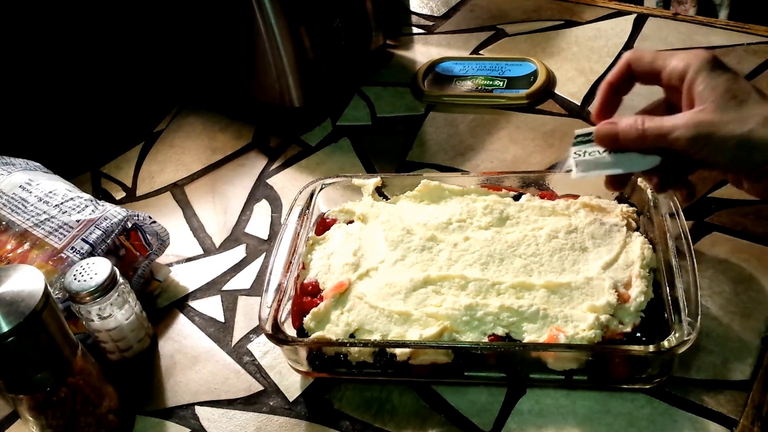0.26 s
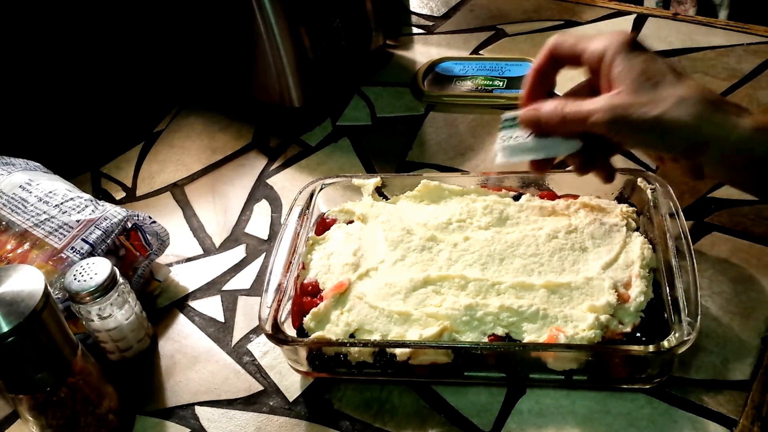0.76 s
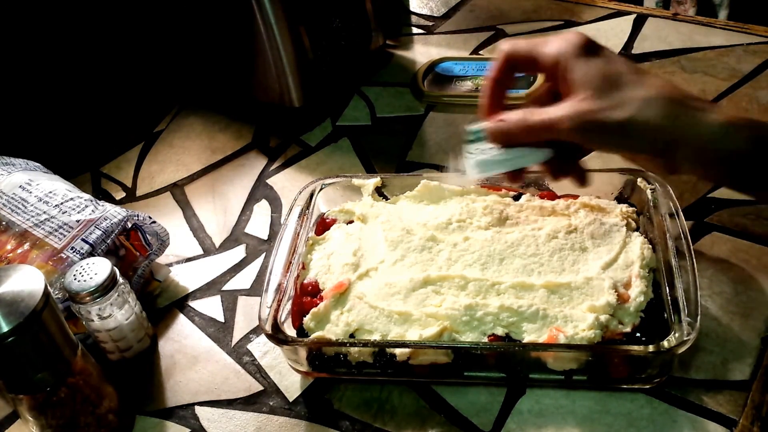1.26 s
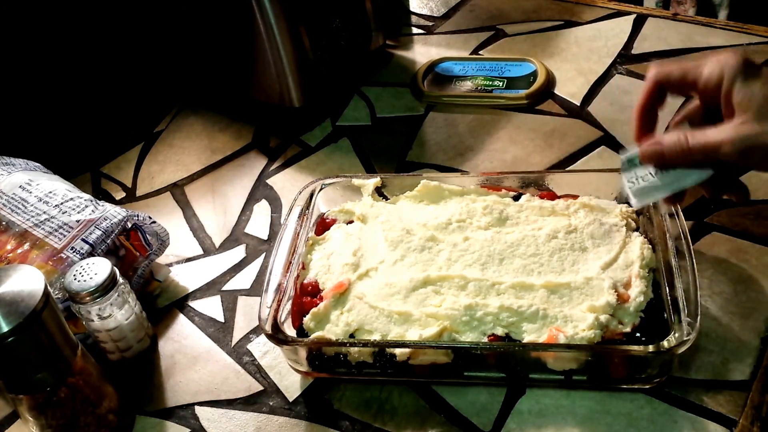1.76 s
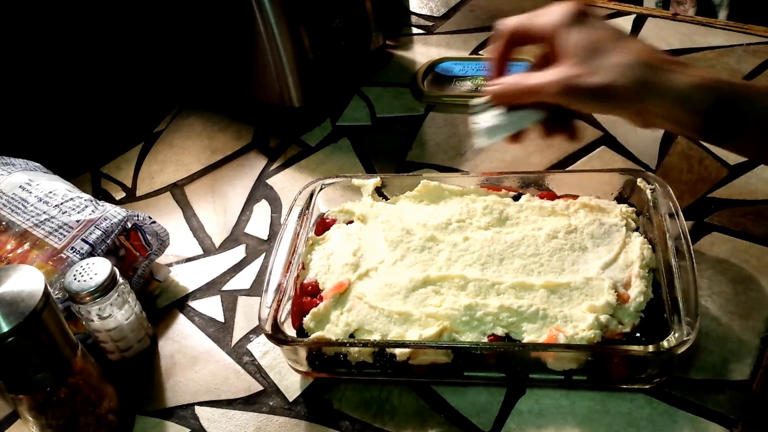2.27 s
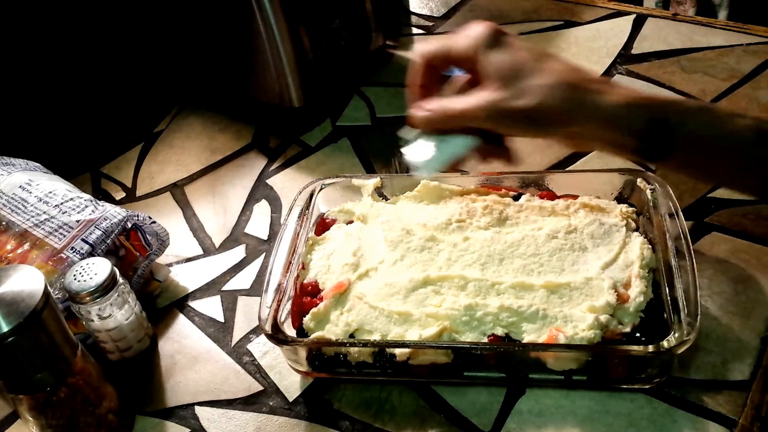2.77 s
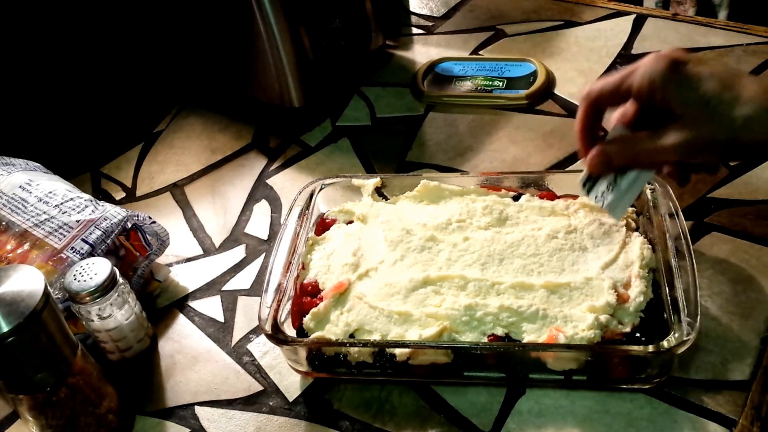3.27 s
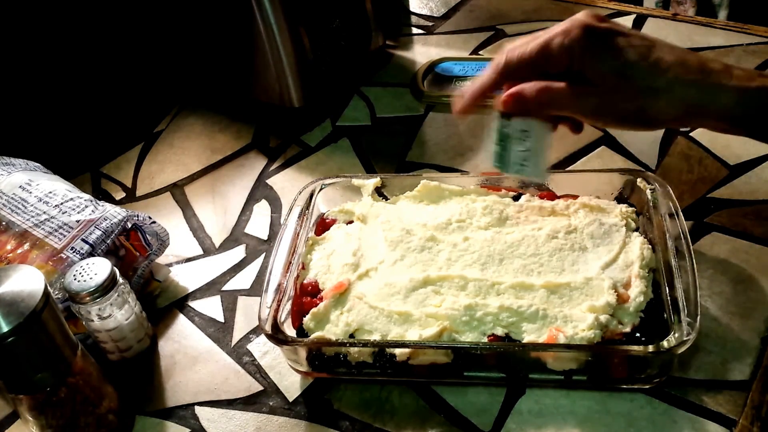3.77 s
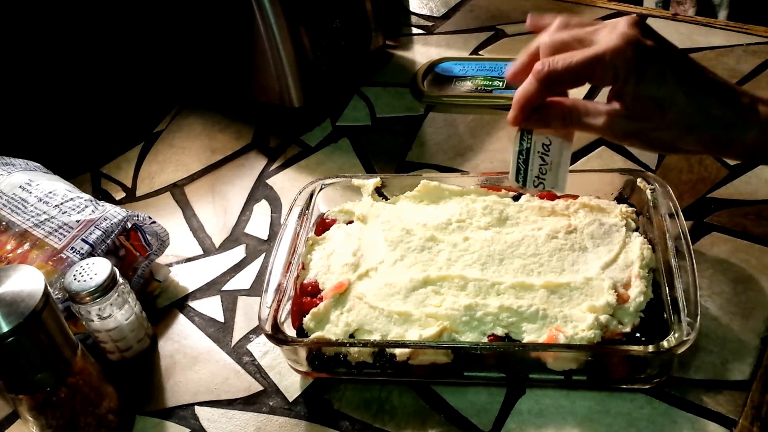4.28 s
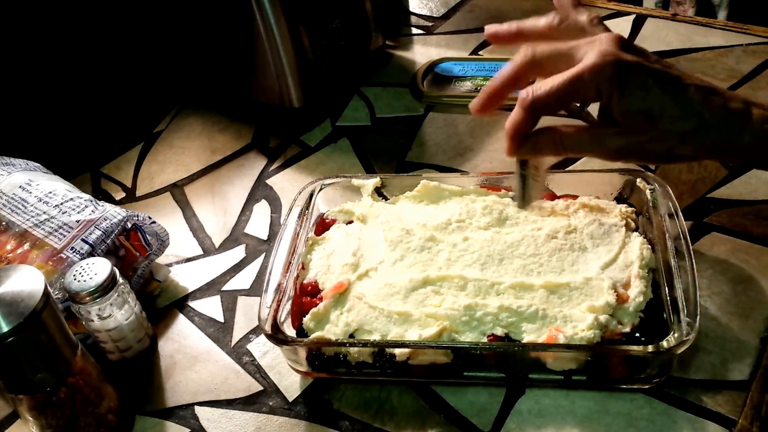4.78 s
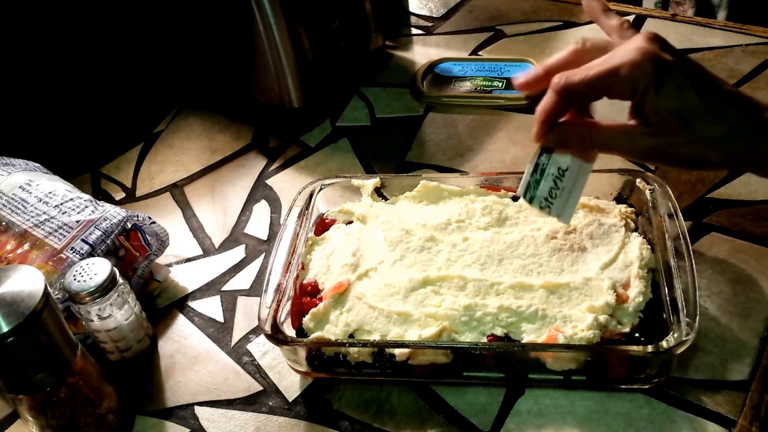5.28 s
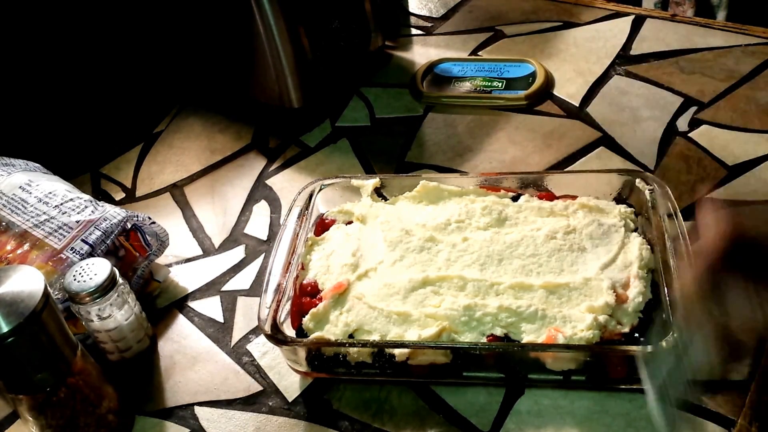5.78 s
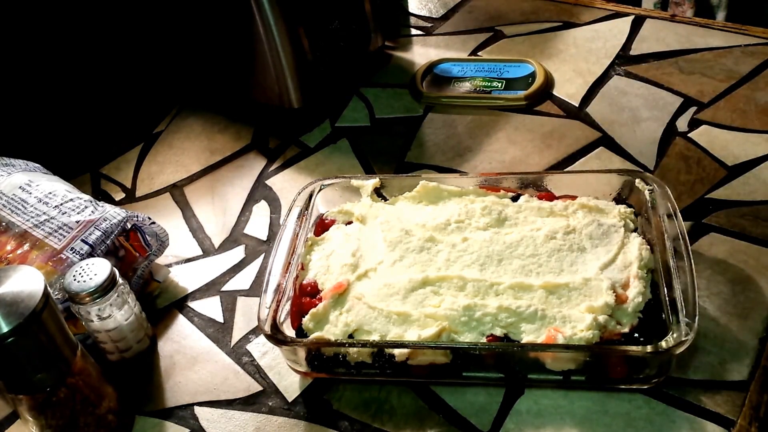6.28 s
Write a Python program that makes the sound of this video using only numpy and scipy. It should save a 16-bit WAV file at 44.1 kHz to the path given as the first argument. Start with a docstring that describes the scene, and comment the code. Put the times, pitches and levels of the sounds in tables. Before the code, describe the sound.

Close stereo pickup in a small quiet kitchen. A paper packet of granules is shaken about eleven times a second, each stroke a soft, bright, grainy hiss. The shaking slows and fades, then fingers pinch and flick the packet: clumped crackle and loud crisp snaps, ending in sparse small ticks. Low rumble, hum and thin hiss stay far underneath.

```python
"""A small paper packet of granules is shaken to and fro over a dish: each stroke is a swell of dense impacts.
It is then pinched and flicked empty: fingers rustle as clumped crackle, creases snap as noise bursts that
set panels ringing, and the sheet's body grows. A kitchen of rumble, hum and hiss runs below throughout,
with three far knocks and two low washes. Two microphone ports each ring at their own treble pitch."""
import sys
import numpy as np
from scipy import signal
from scipy.io import wavfile
from scipy.ndimage import uniform_filter1d

SR = 44100
rng = np.random.default_rng(int(sys.argv[2]) if len(sys.argv) > 2 else 0)


def inscribe(sig):
    """Save sig as 16-bit PCM at rate SR to the path in sys.argv[1].

    A 1-D sig is mono; a 2-D sig holds one channel per row.
    Samples are clipped to [-1, 1] before scaling.
    """
    pcm = np.round(np.clip(np.atleast_2d(sig).T, -1, 1) * 32767)
    wavfile.write(sys.argv[1], SR, pcm.astype(np.int16))


N = 287644
TIME = np.arange(N) / SR

# creases snapping: start_s, level_db (bright part's peak), panel_ring_hz,
# low_db (850-2600 Hz part re bright part), crackle_db (crackle after, re level_db)
CREASE_SNAPS = [(0.232, -38, 2850, -11, -19), (1.267, -23.5, 4400, -29, -35),
                (1.9727, -43, 2780, -2.5, -28), (2.811, -36, 3600, -13, -35), (2.9262, -27, 4460, -25, -29),
                (3.46, -34.5, 4390, -29, -28.5), (3.5016, -22.5, 3170, -18.5, -28),
                (3.584, -25, 4870, -12, -31), (3.674, -32, 4550, -33, -27), (3.6926, -34.5, 4500, -31, -12),
                (3.717, -15, 4730, -40, -21.5), (3.7819, -16, 4400, -17, -16),
                (3.8078, -24, 4500, -12.5, -12), (3.8215, -13, 2670, -29, -28),
                (3.841, -18.5, 4360, -17, -26), (3.856, -24, 4180, -34, -27),
                (3.908, -23, 4800, -16.5, -18), (3.939, -39, 4500, -28, -28), (3.956, -34, 4410, -35, -23),
                (3.9719, -29, 4470, -37, -14), (4.1128, -21, 2500, -16.5, -24),
                (4.1977, -44.5, 4450, -30, -18), (4.2198, -51.5, 2590, -37, -29),
                (4.277, -40, 4600, -28, -5), (4.2873, -13, 4840, -29.5, -15.5),
                (4.342, -12, 2730, -30, -24.5), (4.411, -24.5, 4700, -36, -22),
                (4.4215, -35, 2370, -18, -31), (4.4975, -40, 3000, -30, -13),
                (4.5657, -24.5, 4900, -16, -21), (4.66, -32, 2600, -17, -20), (4.7832, -31, 4450, -30, -5),
                (4.7902, -9, 3650, -24.5, -17.5), (4.8073, -12, 3380, -39, -15),
                (4.8109, -11.5, 2570, -15, -13.5), (4.879, -29, 2600, -22, -10),
                (4.9277, -27.5, 4490, -26, -4.5), (4.9372, -9, 3380, -34, -24),
                (4.9509, -17.5, 2720, -26, -15.5), (5.024, -22.5, 2830, -15, -17),
                (5.1598, -12, 3170, -31, -13), (5.2095, -23, 3050, -13.5, -20),
                (5.269, -40, 2620, -29, -27), (5.3162, -15.5, 3130, -34, -19),
                (5.3777, -15.5, 2740, -17.5, -27.5), (5.395, -26, 3800, -11, -31),
                (5.458, -25, 4540, -20, -30), (5.4649, -23, 2660, -26, -36), (5.628, -44.5, 3970, -20, -11),
                (5.682, -50, 2580, -30, -19), (5.753, -45.5, 3450, -10, -1.5),
                (5.9286, -43, 3690, -20, -21), (5.9385, -44, 3490, -23, -24),
                (6.091, -52.5, 4580, -16, -25), (6.2195, -42, 2090, -15, -23), (6.2368, -41, 2550, -5, -34),
                (6.2637, -31.5, 2730, -15.5, -24), (6.2696, -18, 4260, -29, -30),
                (6.3529, -35.5, 3450, -23, -16), (6.421, -47, 2090, -10, -21), (6.4942, -56, 3150, -7, -30)]
# where the packet is: time_s, left_re_right_db
HAND_PATH = [(0.0, 2.5), (1.05, 0), (1.89, 0.0), (2.54, 0), (3.47, 2), (4.99, 1.0), (6.3, 3), (6.52, 3)]


def amp(db):
    """Convert dB to amplitude gain."""
    return 10 ** (np.asarray(db) / 20)


def rms_one(x):
    """Scale to rms 1."""
    return x / np.sqrt(np.mean(x ** 2) + 1e-20)


def in_time(rows):
    """Interpolate a (time, value) curve at every sample."""
    time_s, value = np.transpose(rows)
    return np.interp(TIME, time_s, value)


def at_hz(points, hz):
    """Read a (frequency, value) curve on a log frequency axis."""
    point_hz, value = np.transpose(points)
    return np.interp(np.log(hz), np.log(point_hz), value)


def pan(db):
    """Left and right gains for a left-re-right difference."""
    return amp(np.array([db / 2, -db / 2]))


def drift(points_per_s):
    """Slow random curve: straight lines between normal draws of spread 1."""
    count = N * 2 // 100
    return np.interp(TIME * points_per_s, np.arange(count), rng.standard_normal(count))


def band(x, low_hz, high_hz):
    """Butterworth band-pass."""
    return signal.sosfilt(signal.butter(2, [low_hz, high_hz], "band", fs=SR, output="sos"), x)


def resonate(x, hz, width_hz):
    """Two-pole resonance with gain near 1 at its peak."""
    r = np.exp(-np.pi * width_hz / SR)
    zeros = np.array([1, 0, -1]) * (1 - r * r) / 2
    poles = [1, -2 * r * np.cos(2 * np.pi * hz / SR), r * r]
    return signal.lfilter(zeros, poles, x)


def granules():
    """Granules thrown against the paper: each stroke swells and fades as a bell of dense impacts."""
    # one row a wrist stroke: peak_s, level_db, length_ms (between points 6.5 dB down)
    strokes = [(0.0, -46.5, 37), (0.094, -49.5, 45), (0.165, -45.5, 45), (0.259, -47.5, 70),
               (0.343, -44.5, 53), (0.438, -44.5, 33), (0.501, -39, 44), (0.603, -47.5, 47),
               (0.692, -48, 44), (0.774, -56, 110), (0.854, -46, 39), (0.949, -51, 39), (1.022, -47, 52),
               (1.11, -51, 41), (1.196, -43.5, 52), (1.275, -41.5, 45), (1.37, -42, 48), (1.462, -52, 45),
               (1.546, -49, 54), (1.64, -57, 77), (1.714, -47, 46), (1.825, -55.5, 73), (1.885, -47.5, 39),
               (1.98, -53.5, 62), (2.043, -48.5, 46), (2.15, -58.5, 59), (2.206, -51.5, 57),
               (2.375, -55, 116), (2.543, -51.5, 79), (2.657, -50, 46), (2.72, -42, 49), (2.84, -52.5, 117),
               (3.056, -51, 76), (3.15, -60.5, 84), (3.235, -58, 51)]
    thrum_db = -0.5  # re sheet body
    hits = grains(8000, spread_db=3.5, alike=0.21)
    hiss = coloured(hits, low_hz=4300, width=0.47, shift_db=2.5, tilt_db=-2)
    thrum = amp(thrum_db + sheet_body_db()) * rms_one(resonate(hits, 3180, 470))
    envelope = np.sqrt(swells(strokes, rise_share=0.52)) * amp(1.07 * drift(150))
    return envelope * pan(in_time(HAND_PATH)) * (hiss + thrum)


def paper():
    """Clumped paper crackle: under the sliding fingers and dying away after each snap."""
    # fingers sliding: peak_s, level_db, length_ms (between points 6.5 dB down)
    rubs = [(3.39, -64.5, 88), (3.53, -48.5, 100), (3.62, -48, 55), (3.667, -49.5, 53), (3.747, -46, 70),
            (3.844, -30.5, 46), (3.95, -45.5, 61), (4.08, -55, 68), (4.387, -48.5, 47), (4.508, -49, 41),
            (4.618, -44.5, 55), (4.668, -36, 10.5), (4.76, -41, 9), (4.865, -41.5, 66), (4.983, -42, 50),
            (5.029, -37.5, 27), (5.203, -33.5, 33), (5.29, -49.5, 81), (5.425, -44.5, 55), (5.585, -65, 38),
            (5.785, -51.5, 44), (5.835, -58.5, 42), (5.95, -60, 53.5), (6.24, -49, 18), (6.295, -52.5, 32),
            (6.35, -50.5, 65)]
    crackle_t60_s = 0.1
    power = swells(rubs, rise_share=0.49)
    for start_s, level_db, _, _, crackle_db in CREASE_SNAPS:
        after = slice(round(start_s * SR), round((start_s + crackle_t60_s) * SR))
        decay_db = -60 * (TIME[after] - start_s) / crackle_t60_s
        power[after] += amp(2 * (level_db + crackle_db + decay_db))
    clumping = amp(2.2 * drift(250) + 1.26 * drift(60))
    hits = grains(10000, spread_db=3.0, alike=0.24) * clumping
    hits = hits + amp(-3) * grains(350, spread_db=3.5, alike=0.8)  # single fibres let go in tiny snaps
    body = rms_one(sheet(hits)) * amp(sheet_body_db() + 1.53 * drift(40))
    rustle = coloured(crease(hits), low_hz=3800, width=0.22, shift_db=3.5, tilt_db=-2.3)
    return np.sqrt(power) * pan(in_time(HAND_PATH)) * (rustle + body)


def snaps():
    """A crease gives way in a burst of a millisecond or two and sets a panel of the sheet ringing."""
    size = 600  # samples
    scatter_db = 1  # left-right spread of creases about the hand
    panel_ring_db, ring_per_low_db = -9.5, 0.35  # the panel rings more after a weightier snap
    out = np.zeros((2, N + size))
    t = np.arange(size) / SR
    hand_db = in_time(HAND_PATH)
    shape = (1 - np.exp(-t / 0.0003)) * (np.exp(-t / 0.0006) + 0.1 * np.exp(-t / 0.003))
    noises = rng.standard_normal((len(CREASE_SNAPS), 3, size + 1))
    for (start_s, level_db, ring_hz, low_db, _), noise in zip(CREASE_SNAPS, noises):
        first = round(start_s * SR)
        burst = (noise[0, 1:] + 0.7 * noise[1:, 1:]) * shape  # shared plus own noise per side
        bright = ports(crease(band(burst, 3550, 15000)))
        ring = resonate(resonate(burst, ring_hz, 800), ring_hz, 800)
        low = band(burst, 850, 2600)
        ring_db = panel_ring_db + ring_per_low_db * low_db
        parts = [(bright, 0), (ring, ring_db), (low, low_db)]
        sound = sum(amp(db) * p / np.abs(p).max(axis=1, keepdims=True) for p, db in parts)
        side = pan(hand_db[first] + scatter_db * noise[0, 0])[:, None]
        out[:, first:first + size] += amp(level_db) * side * sound
    return out[:, :N]


def grains(per_s, spread_db, alike):
    """Random tiny impacts of uneven size and either sign, partly shared by both sides; rms 1."""
    shape = (3, N)
    hits = (rng.random(shape) < per_s / SR) * amp(spread_db * np.minimum(rng.exponential(1, shape), 5))
    hits = hits * rng.choice([-1, 1], shape)
    return rms_one(np.sqrt(alike) * hits[0] + np.sqrt(1 - alike) * hits[1:])


def swells(rows, rise_share):
    """Summed power of bells; rise_share is the part of each length spent rising."""
    power = np.zeros(N)
    for peak_s, level_db, length_ms in rows:
        near = slice(max(round((peak_s - 0.25) * SR), 0), round((peak_s + 0.25) * SR))
        late_ms = (TIME[near] - peak_s) * 1000
        half_ms = length_ms * np.where(late_ms < 0, rise_share, 1 - rise_share)
        power[near] += amp(2 * (level_db - 6.5 * np.abs(late_ms / half_ms) ** 1.284))
    return power


def coloured(hits, low_hz, width, shift_db, tilt_db):
    """Deal impacts to patches of paper, each with its own broad pitch; through the ports, rms 1."""
    pitches_hz, out = np.geomspace(low_hz, 14500, num=7), 0
    dealt = rng.integers(0, len(pitches_hz), N)
    for k, hz in enumerate(pitches_hz):
        share = amp(tilt_db * np.log2(hz / 7200) + shift_db * drift(13))  # tilt per octave; patches take turns
        patch = hits * (dealt == k) + 1e-18
        out = out + share * resonate(patch, hz, width * hz)
    return rms_one(ports(out))


def crease(x):
    """Stiff creased paper: a duller top plus one broad treble resonance."""
    # ring_hz, width_hz, level_db
    ring_hz, width_hz, level_db = (5570, 990, 7.9)
    dull = signal.sosfilt(signal.butter(2, 10000, fs=SR, output="sos"), x)
    return dull + amp(level_db) * resonate(dull, ring_hz, width_hz)


def sheet(x):
    """Broad sheet resonances of alternating sign, each waxing and waning as the sheet bends."""
    # paper body: pitch_hz, width_hz, level_db
    modes = [(3044, 360, 17.5), (1310, 1300, 10.5), (506, 340, 10), (4470, 1430, 13)]
    out = 0
    for k, (hz, width_hz, level_db) in enumerate(modes):
        out = out + (-1) ** k * amp(level_db + 4.7 * drift(25)) * resonate(x, hz, width_hz)
    return out


def sheet_body_db():
    """Body level re the rustle or granule hiss, rising as the packet empties."""
    full_db, empty_db, emptying_s = -35, -8, (0.38, 5.64)
    return np.interp(TIME, emptying_s, [full_db, empty_db])


def ports(x):
    """Each microphone port rings at its own pitch over a weak flat path; the right is a little later."""
    # left, right: ring_hz, width_hz, flat_re_ring_db
    port_rings = [(6755, 840, -19.5), (7910, 1010, -17)]
    out = np.array([resonate(side, hz, width_hz) + amp(flat_db) * side
                    for side, (hz, width_hz, flat_db) in zip(x, port_rings)])
    out[1] = np.roll(out[1], 1)  # samples
    return out


def counter_and_walls(x):
    """Tiles, dish and walls as a short decaying noise tail, stronger early, separate in each side."""
    room_t60_s, room_db = 0.13, -11
    t = np.arange(int(0.2 * SR)) / SR
    tail = rng.standard_normal((2, len(t))) * amp(-60 * t / room_t60_s) * (t > 0.0012)
    tail[:, :int(0.006 * SR)] *= 1.8
    tail /= np.sqrt((tail ** 2).sum(axis=1, keepdims=True))
    return amp(room_db) * signal.fftconvolve(x, tail, axes=1)[:, :N]


def kitchen():
    """Half-octave rumble bands, a wavering mains hum and a thin hiss partly through the ports."""
    # rumble level: time_s, level_db
    air = [(0.0, -67), (1.07, -69.5), (1.29, -65), (2.25, -70), (2.67, -66.5), (3.43, -74), (3.79, -64),
           (4.14, -72), (5.32, -66), (5.54, -69.5), (6.17, -72), (6.52, -69)]
    # rumble spectrum before scaling to rms 1: band_hz, density_db
    spectrum = [(30, -12.5), (43, -13.5), (64, 1), (305, -7), (430, -6.5), (517, -9.5), (700, -20),
                (910, -48.5)]
    # left-right likeness, clipped at 0: band_hz, correlation
    likeness = [(60, 0.65), (240, 0.52), (950, -0.069), (3770, 0.01), (15000, -0.08)]
    hum_hz, hum_db, hiss_db = 58.6, -5, -2  # levels re rumble, before the hum wavers and hiss parts add
    level_db = in_time(air)
    edges_hz = 21 * 2 ** np.arange(0, 5.6, 0.5)
    white = rng.standard_normal((2, 2, N))
    rumble = 0
    for k, (low_hz, high_hz) in enumerate(zip(edges_hz, edges_hz[1:])):
        centre_hz = np.sqrt(low_hz * high_hz)
        mid, side = band(white[k % 2], low_hz, high_hz)
        alike = np.clip(at_hz(likeness, centre_hz), 0, 1)
        gain = amp(at_hz(spectrum, centre_hz) + 1.13 * drift(8))
        rumble = rumble + gain * (np.sqrt(1 + alike) * mid + np.sqrt(1 - alike) * side * [[1], [-1]])
    noise = rng.standard_normal((2, N))
    hiss = rms_one(band(noise, 330, 5200))
    hiss = hiss + amp(1) * rms_one(ports(noise))
    hiss = hiss + amp(-2.0) * rms_one(band(noise, 2477, 15060))
    hum_phase = 2 * np.pi * hum_hz * TIME + 1.5 * drift(8)
    hum = amp(level_db + hum_db + 3.0 * drift(10)) * np.sin(hum_phase)
    noise_bed = amp(level_db) * rms_one(rumble) + amp(level_db + hiss_db) * hiss
    return noise_bed * pan(2.2)[:, None] + hum


def far_knocks():
    """Knocks elsewhere in the house as decaying sines, and low washes of fading band noise."""
    # knocks: start_s, level_db, pitch_hz, t60_s
    thuds = [(1.173, -38, 185, 0.024), (2.64, -56, 100.6, 0.37), (5.574, -56, 830, 0.077)]
    # washes: start_s, end_s, level_db, top_hz
    washes = [(1.156, 1.79, -65, 472), (2.373, 2.85, -69.5, 466)]
    out = np.zeros((2, N))
    for start_s, level_db, hz, t60_s in thuds:
        t = np.maximum(TIME - start_s, 0)
        onset = 1 - np.exp(-t * hz * 3.6)
        out += amp(level_db - 60 * t / t60_s) * np.sin(2 * np.pi * hz * t) * onset
    for start_s, end_s, level_db, top_hz in washes:
        part = np.clip((TIME - start_s) / (end_s - start_s), 0, 1)
        shape = np.minimum(part / 0.031, 1) * (1 - part) ** 1.1
        noise = rng.standard_normal(N)
        for low_hz in (323, 220, 100):
            noise = band(noise, low_hz, top_hz)
        out += amp(level_db) * shape * rms_one(noise) * pan(8.7)[:, None]
    return out


def scene():
    """Packet in the room, over the background."""
    packet = granules() + paper() + snaps()
    return packet + counter_and_walls(packet) + kitchen() + far_knocks()


def record(dry):
    """A noise suppressor lowers all while the treble is quiet and lifts it when loud; two low-passes follow."""
    quiet_db, open_db, range_db = -75.5, -49.5, 4.5  # treble level closed, treble level open, total gain swing
    top_hz, cutoff_hz = 14700, 15956  # stopband edges
    dc_offset = -0.0003
    treble = band(dry.mean(axis=0), 3000, 13200)
    level_db = 10 * np.log10(uniform_filter1d(treble ** 2, size=1800) + 1e-12)
    opened = np.clip((level_db - quiet_db) / (open_db - quiet_db), 0, 1)
    gated = dry * amp(range_db * (uniform_filter1d(opened, size=900) - 0.5))
    dropped = signal.sosfilt(signal.cheby2(12, 30, top_hz, fs=SR, output="sos"), gated)
    return signal.sosfilt(signal.cheby2(12, 70, cutoff_hz, fs=SR, output="sos"), dropped) + dc_offset


dry = scene()
out = record(dry)
inscribe(out)
```